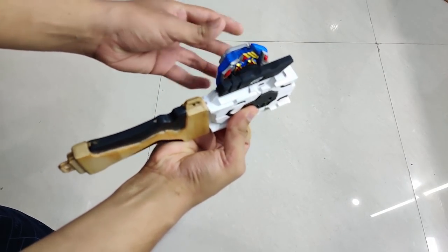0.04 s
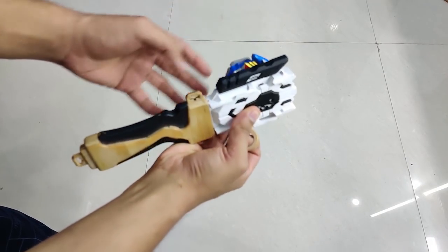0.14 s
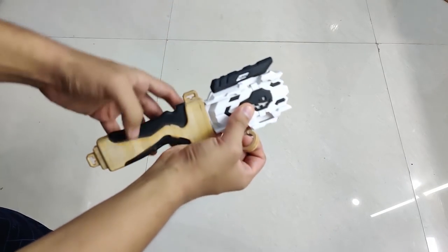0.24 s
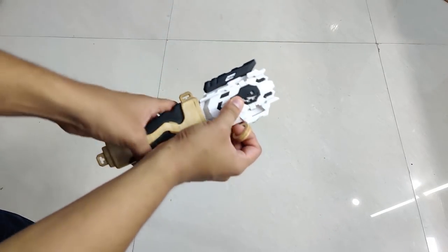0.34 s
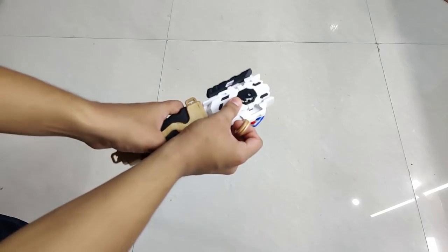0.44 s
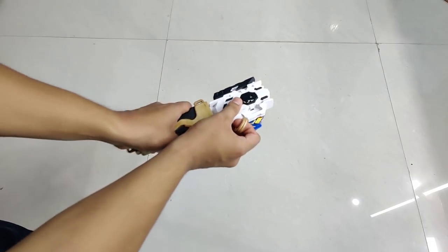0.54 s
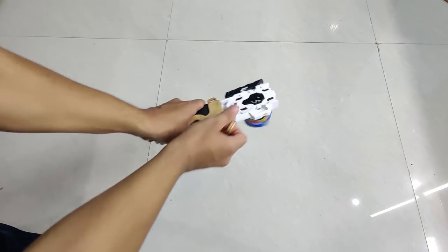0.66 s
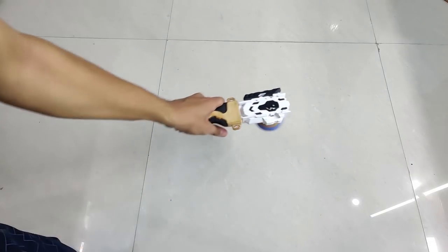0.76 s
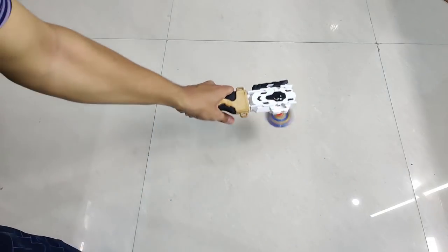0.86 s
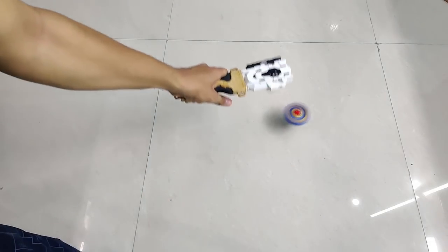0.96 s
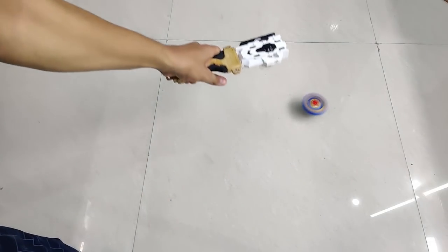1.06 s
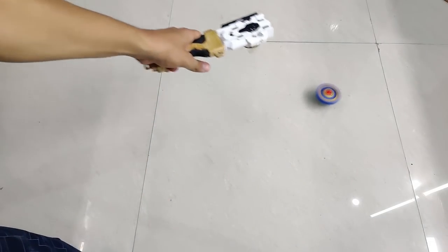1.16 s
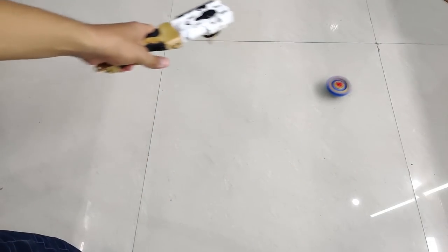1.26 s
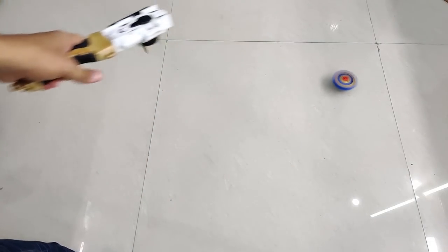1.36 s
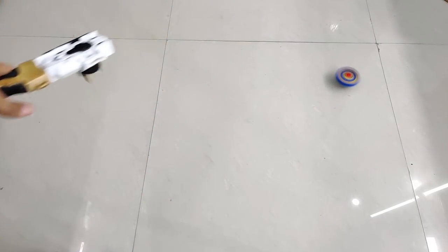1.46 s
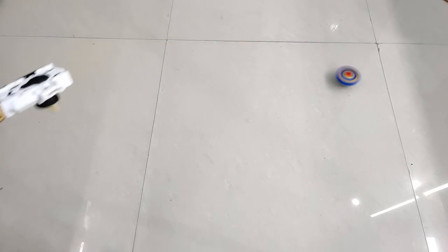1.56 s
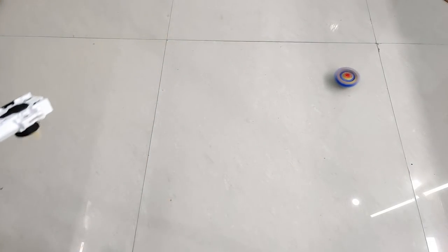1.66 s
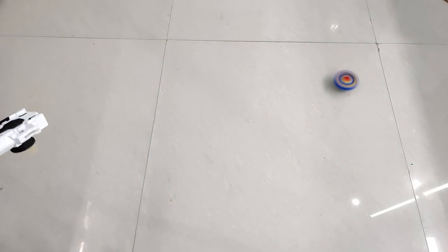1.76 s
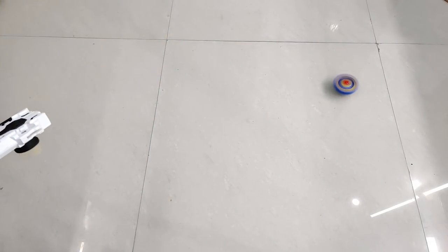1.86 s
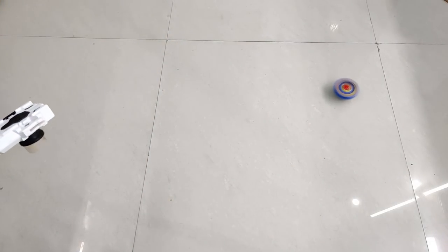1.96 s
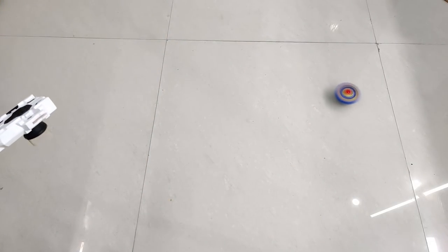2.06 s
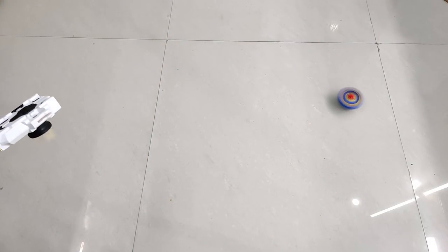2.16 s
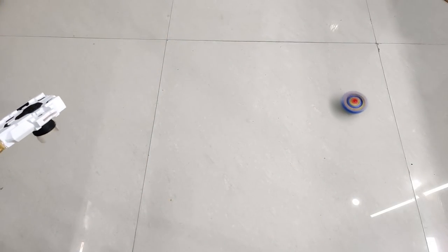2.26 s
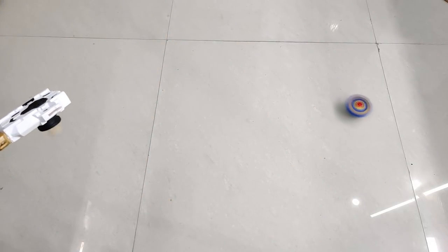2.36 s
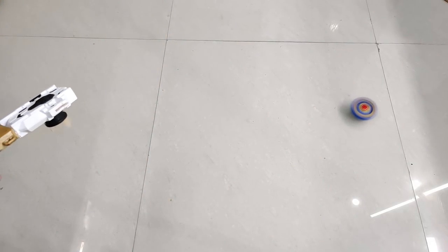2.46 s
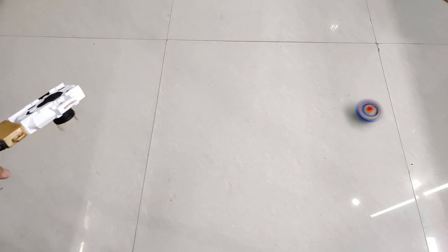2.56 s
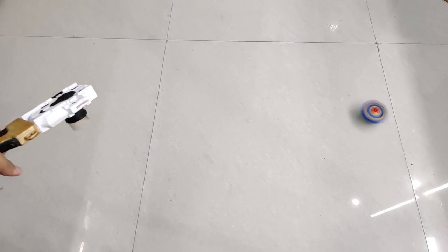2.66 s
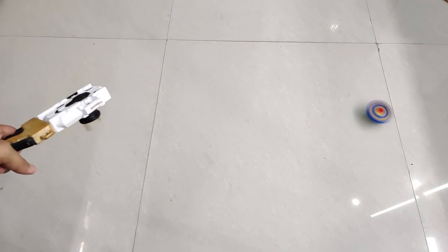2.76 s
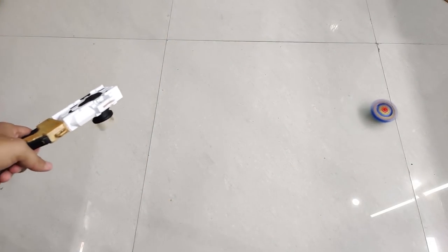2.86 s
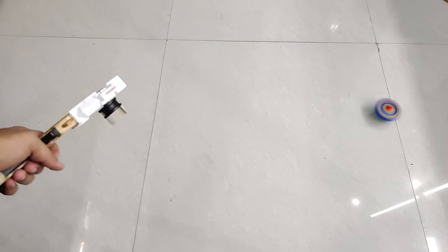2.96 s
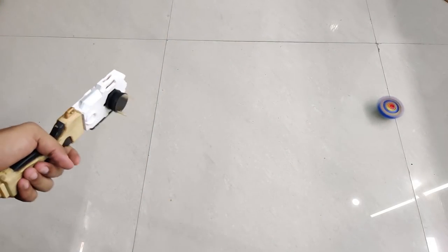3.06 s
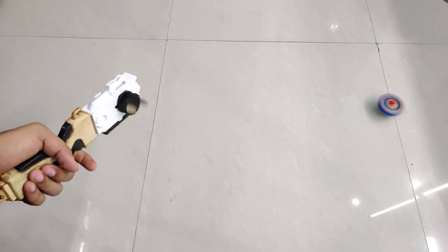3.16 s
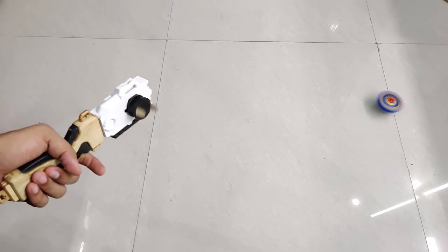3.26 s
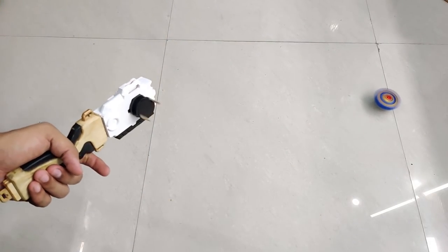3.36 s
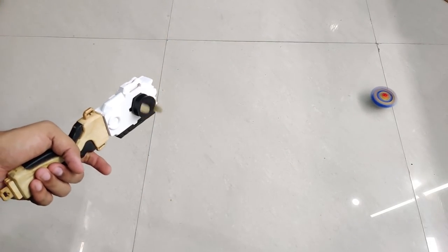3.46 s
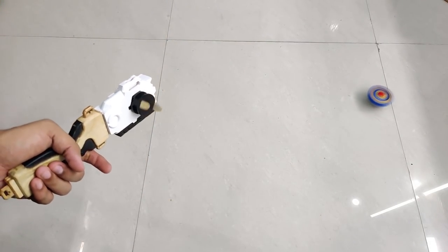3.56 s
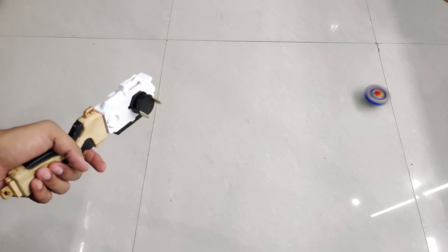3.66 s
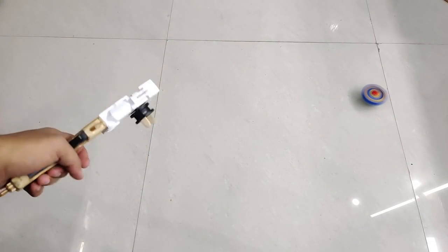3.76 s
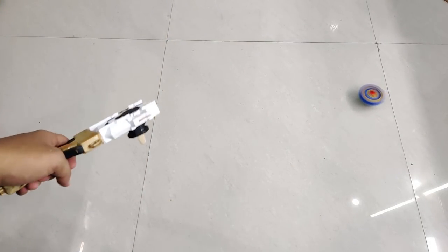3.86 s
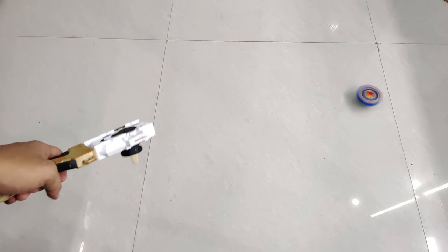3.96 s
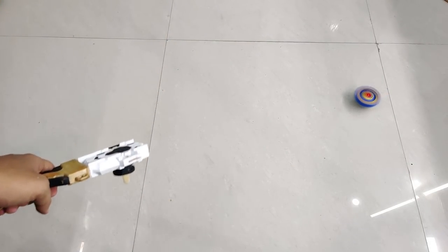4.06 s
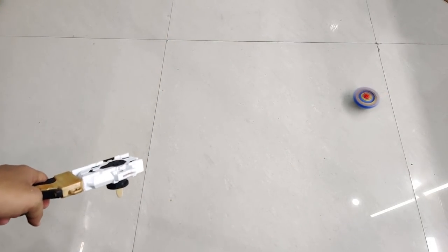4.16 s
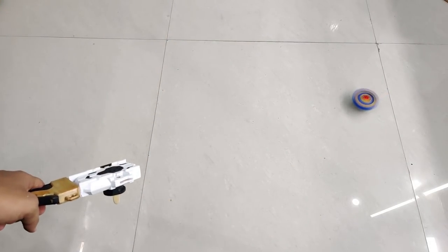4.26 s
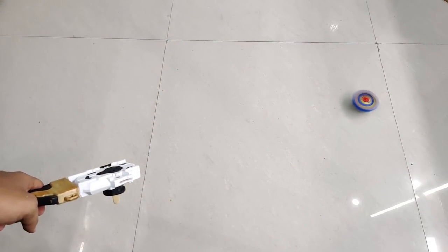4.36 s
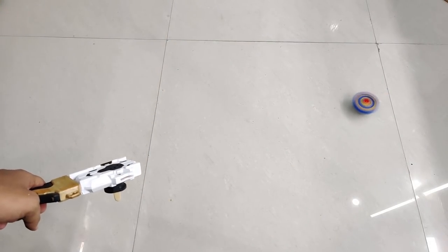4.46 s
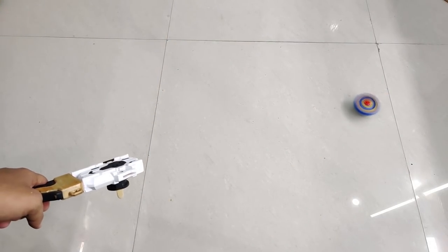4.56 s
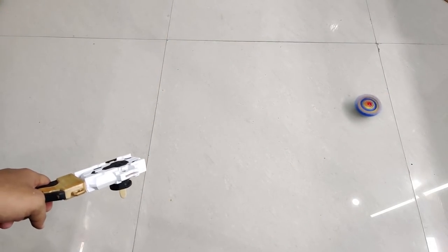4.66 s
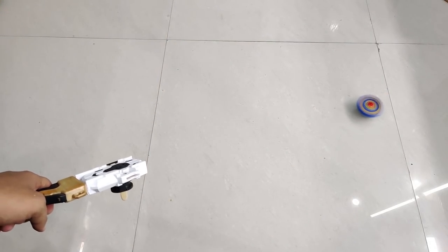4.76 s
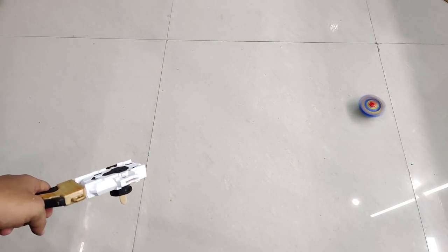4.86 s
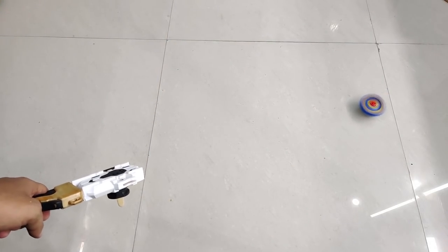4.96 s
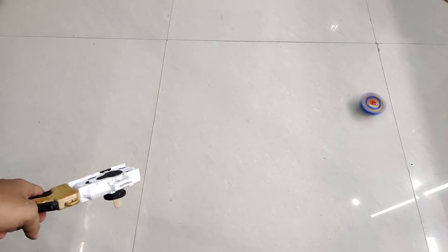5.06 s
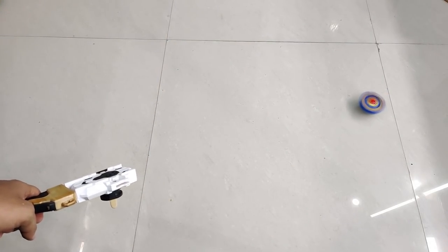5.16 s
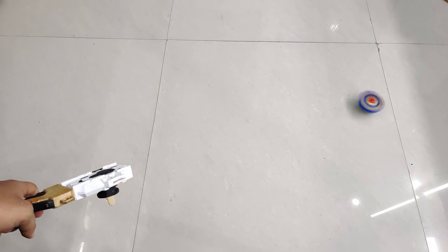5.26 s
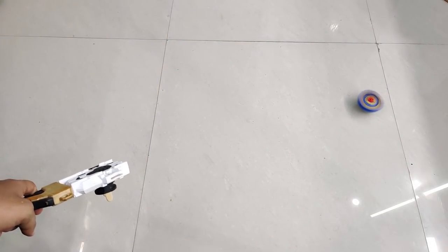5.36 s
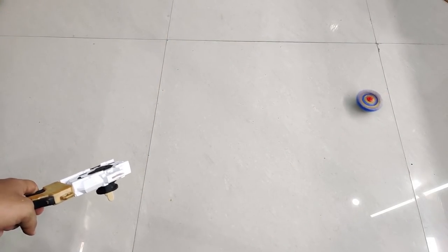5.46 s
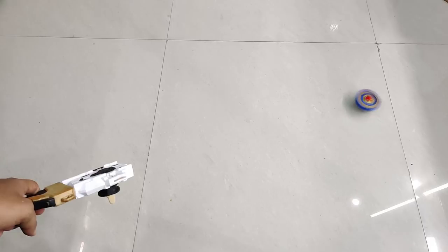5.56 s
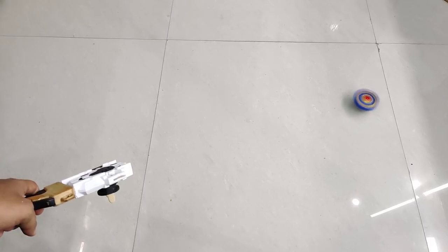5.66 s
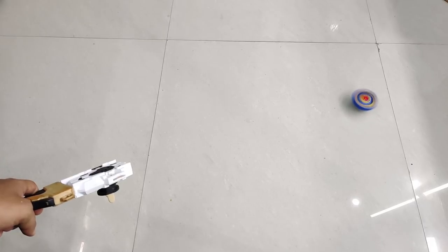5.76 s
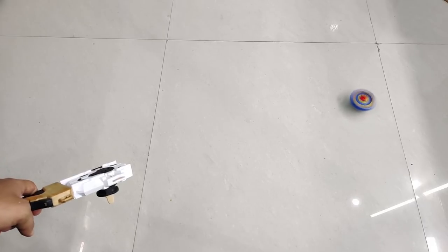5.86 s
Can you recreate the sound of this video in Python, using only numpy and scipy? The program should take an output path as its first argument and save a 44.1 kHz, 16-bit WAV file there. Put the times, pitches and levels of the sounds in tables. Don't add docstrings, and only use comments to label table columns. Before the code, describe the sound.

Close stereo phone capture in a hard-walled room: soft skin rubbing on a toy launcher, then a sudden bright ratcheting rip, hollow gears running free and several hard plastic knocks on tile. The spinning top scrapes and buzzes, swells in a rocking rattle around two seconds, then thins with tiny gritty clicks to a barely audible whirr beneath steady electrical hum.

```python
import sys
import numpy as np
from scipy import signal
from scipy.fft import rfft, irfft, next_fast_len
from scipy.io import wavfile
from scipy.ndimage import uniform_filter1d, map_coordinates

SR = 44100
rng = np.random.default_rng(int(sys.argv[2]) if len(sys.argv) > 2 else 0)


def inscribe(sig):
    pcm = np.round(np.clip(np.atleast_2d(sig).T, -1, 1) * 32767)
    wavfile.write(sys.argv[1], SR, pcm.astype(np.int16))


def nominal_scale(level):
    x = np.asarray(level, float) / 20
    return 10 ** x


N = 260631

# (frequency [Hz], density [dB per Hz])
GEAR_HISS = [(4700, -23), (8000, -1.5), (9400, -12.5), (10300, -5.5), (12100, -6), (14500, 0.5),
             (16000, -4)]
# (frequency [Hz], density [dB per Hz])
FREE_GEARS = [(290, -50), (500, -17.5), (1000, -10), (1450, 1.5), (1950, -19), (2400, -10.5), (4270, -3.5),
              (7000, -20.5), (8650, -17), (15800, -9)]


def unit(x):
    return x / np.sqrt(np.mean(x ** 2) + 1e-20)


def along(points, hz):
    f, v = np.transpose(points)
    return np.interp(np.log(hz + 1), np.log(f + 1), v)


def curves(rows):
    s, *columns = np.transpose(rows)
    t = np.arange(N) / SR
    inside = 1. * (t > s[0]) * (t < s[-1])
    return [np.interp(t, s, c) for c in columns] + [uniform_filter1d(inside, size=60)]


def swells(rows):
    t, power = np.arange(N) / SR, 0
    for s, half, *db in rows:
        power = power + nominal_scale(2 * np.array(db)[:, None] - 9.6 * ((t - s) / half) ** 2)
    return np.sqrt(power)


def wobble(rate):
    coarse = np.arange(0, N + 16, 16)
    knots = rng.standard_normal(int(N * rate / SR) + 4)
    return np.interp(np.arange(N), coarse, map_coordinates(knots, [coarse * rate / SR]))


def filtered(x, response):
    n = x.shape[-1]
    m = next_fast_len(n + 4096, True)
    return irfft(rfft(x, m) * response(np.fft.rfftfreq(m, 1 / SR)), m)[..., :n]


def colour(points):
    return lambda hz: nominal_scale(along(points, hz))


def modes(rows):
    def response(f):
        total = 0
        for k, (centre, width, db) in enumerate(rows):
            damping = 1j * f * width
            total = total + (-1) ** k * nominal_scale(db) * damping / (centre * centre - f * f + damping)
        return total
    return response


def steep(rows):
    return lambda f: modes(rows)(f) ** 2


def pair(beat, response):
    # (frequency [Hz], correlation [-1 to 1])
    coherence = [(60, 0.89), (270, .9), (450, 0.61), (740, 0.23), (1400, -0.27), (3100, 0.029),
                 (9000, -0.1), (15000, -0.0015)]
    turn = lambda hz: np.arccos(np.clip(along(coherence, hz), -1, 1)) / 2
    split = lambda hz: response(hz) * [np.cos(turn(hz)), np.sin(turn(hz))]
    mid, side = filtered(beat * rng.standard_normal((2, N)), split)
    return unit(np.array([mid + side, mid - side]))


def panned(db):
    return nominal_scale(np.array([db / 2, -db / 2]))


def patchy(x, depth_db):
    z = signal.stft(x, nperseg=512)[2]
    field = uniform_filter1d(rng.standard_normal(z.shape[1:]), size=3, axis=0)
    field = uniform_filter1d(field, size=50, axis=1)
    return unit(signal.istft(z * nominal_scale(depth_db * unit(field)), nperseg=512)[1][:, :N])


def bursts(rows, db, t60, response):
    t, out = np.arange(SR // 20) / SR, np.zeros((2, N + SR))
    shared, own = rng.standard_normal((2, len(rows), 2, len(t)))
    snap = 4 * (t == 0)
    chatter = shared[:, :1] + 0.93 * own
    shots = filtered(nominal_scale(-60 * t / t60) * (chatter + snap), response)
    for row, level, shot in zip(rows, db, shots):
        start = round(row[0] * SR)
        shot = shot / abs(shot).max(1, keepdims=True)
        out[:, start:start + len(t)] += nominal_scale(level) * panned(row[-1])[:, None] * shot
    return out[:, :N]


def room_tone():
    # (time [s], gain [dB])
    gain_control = [(0.0, 0), (0.66, 1.5), (0.91, 3.5), (0.99, -4), (1.02, -9), (1.15, 1), (1.35, 5.5),
                    (2.83, 5.5), (4.08, 0), (5.6, 1.2), (5.91, -0.3)]
    # (frequency [Hz], width [Hz], level [dB])
    machinery = [(12, 12, -4.5), (56.1, 34, 0), (92.5, 20, -2), (148, 14, -6.5)]
    # (time [s], half length [s], level [dB])
    jolt = [
        (.87, 0.049, -47.5),
    ]
    # (frequency [Hz], level [dB])
    whines = [(1733, -86), (2982, -86), (3849, -76.5), (4328, -83)]
    # (frequency [Hz], density [dB per Hz])
    air_noise = [(110, -6.5), (170, 0), (260, -2), (860, -10.5), (1320, -13.5), (2320, -18), (3300, -18),
                 (3650, -14.5), (4300, -13.5), (4700, -23), (5420, -24), (8800, -26), (15000, -23.5),
                 (15800, -27)]
    hum_hz, hum_db = 199.6, -53
    slip_s = 3.053
    upper_db, lower_db, wander_db = -64.5, -62.5, 1.5

    t, lift_db = np.arange(N) / SR, curves(gain_control)[0]
    slip = np.sign(t - slip_s) * np.clip(abs(t - slip_s) / 0.0022, 0, 1)
    hum = np.sin(2 * np.pi * hum_hz * t + 0.33 * wobble(1.7))
    hum = np.sqrt(2) * nominal_scale(hum_db + lift_db + 0.18 * wobble(9.3)) * slip * hum

    upper, lower = pair(1, steep(machinery[2:])), pair(1, steep(machinery[:2]))
    drone = nominal_scale(upper_db + lift_db + wander_db * wobble(2.98)) * upper
    drone += np.hypot(nominal_scale(lower_db + lift_db + wander_db * wobble(3.14)), swells(jolt)) * lower

    flicker_db, drift = 1.5 * wobble(9), .6 * wobble(8)
    phase = drift + [[0], [1]]
    whine = sum(nominal_scale(db + flicker_db) * np.sin(2 * np.pi * hz * t + phase) for hz, db in whines)
    air = nominal_scale(-63.0 + lift_db) * pair(nominal_scale(0.47 * wobble(23)), colour(air_noise))
    return hum + drone + nominal_scale(1.7 + 0.6 * lift_db) * whine + air


def hands():
    # (time [s], half length [s], rub [dB], squeak [dB], hiss [dB])
    strokes = [
        (.328, 0.012, -68, -90, -83),
        (.49, 0.044, -64.5, -68, -67),
        (.6, .07, -59.5, -74.5, -72),
        (.672, 0.026, -60, -67, -86),
        (.74, .014, -55, -63, -57.5),
    ]
    # (frequency [Hz], density [dB per Hz])
    skin = [(240, -33.5), (400, -10.5), (531, -5), (975, -7), (1240, -9), (1460, -6.5), (1590, -20),
            (2150, -18), (4500, -13.5), (5850, -37), (9900, -120)]
    # (frequency [Hz], density [dB per Hz])
    skin_hiss = [(4000, -29.5), (6000, 2), (9000, -2.5), (15000, -7), (16000, -7.5)]
    rub, squeak, hiss = swells(strokes)
    rub = rub * nominal_scale(4.5) * pair(nominal_scale(1.1 * wobble(39.2)), colour(skin))
    squeak = squeak * nominal_scale(4.0) * pair(1, steep([(4870, 290, 0)]))
    return rub + squeak + hiss * nominal_scale(2.5) * pair(1, colour(skin_hiss))


def ticks():
    # (time [s], peak [dB], left-right [dB])
    grains = np.array([(3.1524, -52, 14), (3.191, -36, 7), (3.1944, -39.5, 6.5), (3.2004, -41, 2.5),
                       (3.2144, -46.5, 6.5), (3.2365, -37, 8.5), (3.2444, -40, 6.5), (3.262, -36, 8.5),
                       (3.2766, -36, 6), (3.3236, -30.5, 9), (3.3498, -45, 2), (3.3858, -40.5, 3.5),
                       (3.4046, -44, 7.5), (3.4371, -39.5, 4), (3.462, -42, -1), (3.4854, -49.5, 2.5),
                       (3.5154, -46.5, 11.5), (3.5194, -43.5, 5), (3.5228, -35, 2), (3.5904, -57, 4.5),
                       (3.6232, -56, 0), (3.6384, -43, 1.5)])
    # (time [s], peak [dB], left-right [dB])
    taps = np.array([
        (0.325, -59, 1.5),
        (5.296, -48.5, 0),
    ])
    # (frequency [Hz], density [dB per Hz])
    grit = [(8000, -39.5), (11500, -14.5), (14500, 7.5), (16200, -7.5)]
    cracking = bursts(grains, grains[:, 1] - .3, .011, colour(grit))
    return cracking + bursts(taps, taps[:, 1] + 1.5, 0.021, colour(FREE_GEARS))


def contacts():
    # (time [s], peak [dB], knock [dB], sizzle [dB], left-right [dB])
    knocks = np.array([(0.8458, -17, -23.5, -9.5, -8), (0.8894, -16.5, -8.5, -7, 3.5),
                       (0.8925, -17, -13.5, -8, 4), (0.9105, -23, -15, -11, 5.5),
                       (0.9859, -19, 2, -16.5, -4), (0.9867, -12.5, -8, -14.5, -3),
                       (1.076, -22.5, -7, -9.5, 2), (1.0798, -15.5, -12, -10.5, 2),
                       (1.094, -14, -22, -19, -5), (1.108, -11.5, -7, -19, -10),
                       (1.1092, -12, -19.5, -19, -10), (1.1712, -13, -7, -18, -4),
                       (1.226, -23, -11.5, -21, -7)])
    # (frequency [Hz], density [dB per Hz])
    crack_spectrum = [(1000, -23.5), (2000, -10.5), (3300, -4.5), (4800, 3.5), (7500, -1), (10000, -12)]
    # (frequency [Hz], width [Hz], level [dB])
    body = [(1520, 1200, 8.5), (2280, 1570, 10)]
    peak, knock, sizzle = knocks[:, 1], knocks[:, 2], knocks[:, 3]
    crack_t60, thud_t60 = .008, .007
    out = bursts(knocks, peak + 3, crack_t60, colour(crack_spectrum))
    out = out + bursts(knocks, peak + knock + 4, thud_t60, steep(body))
    return out + bursts(knocks, peak + sizzle + 1.5, crack_t60, colour(GEAR_HISS))


def launcher():
    # (time [s], level [dB])
    drag = [
        (.695, -70.5),
        (.719, -70),
        (.743, -47.5),
        (.775, -34),
        (.819, -27.5),
        (.915, -23),
        (.973, -23.5),
        (.98, -25.5),
        (.985, -30.5),
    ]
    # (time [s], left-right [dB])
    swing = [
        (.72, 5),
        (.82, -0.7),
        (.984, 1),
    ]
    # (time [s], half length [s], housing ring [dB], handle boom [dB], rack whistle [dB])
    strain = [
        (.727, .018, -49, -62, -73),
        (.765, .018, -39, -54, -42),
        (.79, .02, -48, -56, -37.5),
        (.945, .045, -36.5, -32.5, -48.5),
    ]
    # (time [s], level [dB], left-right [dB])
    free_run = [
        (.983, -27, 4.5),
        (1.0, -30.5, -6.5),
        (1.04, -31.5, -4),
        (1.0765, -34.5, -4),
    ]
    # (frequency [Hz], density [dB per Hz])
    gears = [(150, -37.5), (250, -12), (485, -7), (593, -9), (833, -5), (1260, -7.5), (1480, -3.5),
             (1950, -1.5), (2490, -0.5), (4410, 2), (5560, 3), (7570, 2), (10000, -3.5), (13000, -33.5),
             (22000, -120)]
    pull_db, on = curves(drag)
    pan_db, (ring, boom, whistle) = curves(swing)[0], swells(strain)
    coast_db, coast_pan_db, free = curves(free_run)
    pull = nominal_scale(pull_db - 0.2)

    slack_db, taut_db, wakes_db, growth = -6.5, 2.2, -33, 1.3
    hiss_db = np.clip(slack_db + growth * (pull_db - wakes_db), slack_db, taut_db)
    teeth = nominal_scale(1.4 * wobble(900) + 0.79 * wobble(170) + 0.29 * wobble(45.03))
    rip = pull * (pair(teeth, colour(gears)) + nominal_scale(hiss_db) * pair(teeth, colour(GEAR_HISS)))

    ring = np.hypot(ring, pull * nominal_scale(-14.5))
    rip += nominal_scale(-2.5) * ring * pair(teeth, steep([(1813, 270, 0)]))
    rip += nominal_scale(-4.5) * boom * pair(teeth, steep([(800, 210, 0)]))
    rip += whistle * pair(teeth, steep([(5350, 716, 0)]))
    coast = free * nominal_scale(coast_db + 1.0) * panned(coast_pan_db) * pair(teeth, colour(FREE_GEARS))
    return on * panned(pan_db) * rip + coast


def top():
    # (time [s], rate [turns per s], skidding share [0-1])
    spin = [
        (1, 85, 0.7),
        (1.55, 60, 0.86),
        (1.85, 87, 0.31),
        (2.9, 84, 0.17),
        (3.3, 60, .05),
        (4.9, 52, .05),
        (5.9, 52, 0.02),
    ]
    # (time [s], level [dB])
    scraping = [(1.08, -29), (1.1, -25.5), (1.13, -29), (1.27, -32), (1.37, -35), (1.52, -38),
                (1.67, -42.5), (2.37, -44.5), (3.03, -48.5), (3.2, -55), (3.51, -67.5), (3.72, -74.5),
                (4.43, -73), (5.32, -76), (5.91, -73)]
    # (time [s], half length [s], low mode [dB], high mode [dB])
    rocking = [(1.078, 0.018, -29, -35), (1.13, .025, -39.5, -45), (1.19, 0.02, -54, -38),
               (1.235, .03, -38, -47), (1.275, 0.026, -46, -35.5), (1.36, 0.037, -54, -60),
               (1.43, .04, -63, -45), (1.58, 0.036, -70, -42), (1.8, 0.072, -45.5, -39),
               (1.9, 0.091, -41, -38.5), (2.09, 0.057, -44.5, -42.5), (2.5, 0.44, -68, -51),
               (2.73, 0.036, -56, -63), (2.88, 0.042, -50, -59), (3.02, 0.095, -54.5, -55),
               (3.28, 0.22, -54.5, -73), (3.82, 0.19, -66.5, -76), (4.5, 0.39, -68, -75),
               (5.07, 0.13, -68.5, -78), (5.7, 0.16, -71, -77.5)]
    # (time [s], half length [s], hiss [dB])
    dust = [
        (1.5, 0.07, -43.5),
        (3.3, 0.22, -61),
        (3.8, 0.44, -73),
    ]
    # (frequency [Hz], width [Hz], level [dB])
    shell_low = [(1545, 230, 0)]
    shell_high = [(1930, 380, 0)]
    # (frequency [Hz], density [dB per Hz])
    skid_spectrum = [(180, -42.5), (300, -15), (396, -16.5), (692, -13), (970, -7), (1230, -11), (1460, -2),
                     (1600, -8.5), (1960, -4), (2240, -8.5), (3090, 0.5), (3430, -7), (3970, 4), (6070, -2),
                     (10000, -13), (13000, -43.5), (22000, -120)]
    rattle_spectrum = [(180, -41), (300, -18), (509, -14.5), (540, -17), (564, -13.5), (970, -6.5),
                       (1160, -8), (1550, -4.5), (2240, -5), (2560, -2), (2960, -1.5), (3530, -4),
                       (5240, -7.5), (6730, -13.5), (10000, -47), (13000, -51.5), (22000, -120)]
    tip_hiss = [(4700, -19), (8000, -2.5), (10500, -2.5), (12700, 1), (14100, 4), (16000, 4.5)]
    landing_s, lean_s, topple_s = 1.0755, 3.0, 5.22

    t, scrape, (low, high) = np.arange(N) / SR, nominal_scale(curves(scraping)[0]), swells(rocking)
    turns, skid, _ = curves(spin)
    skid = np.clip(skid, 0, 1)
    angle = 2 * np.pi * np.cumsum(turns) / SR + .5 * wobble(14)
    scuff = np.cos(angle) * (1 + 0.32 * wobble(7.9))
    grain = wobble(700)

    low_beat, high_beat = nominal_scale(1.6 * scuff + 1.2 * grain), nominal_scale(1.7 * scuff + 1.6 * grain)
    whirr = nominal_scale(-71)
    shell = np.hypot(low, whirr) * nominal_scale(1.6) * pair(low_beat, steep(shell_low))
    shell += np.hypot(high, scrape * nominal_scale(-8)) * nominal_scale(-2.0) * pair(high_beat, steep(shell_high))

    topple = nominal_scale(-80.5 + 14 * np.maximum(t - topple_s, 0))
    lean = np.hypot(low * nominal_scale(-10), topple)
    shell += (t > lean_s) * lean * nominal_scale(3.5) * pair(nominal_scale(1.5 * scuff), steep([(1063, 210, 0)]))

    beat = nominal_scale(0.33 * scuff + 0.93 * grain + 0.5 * wobble(35.12))
    rattle = np.sqrt(skid) * pair(beat, colour(skid_spectrum))
    rattle = rattle + np.sqrt(1 - skid) * pair(beat, colour(rattle_spectrum))
    rattle = np.hypot(scrape, low * nominal_scale(-2.5)) * nominal_scale(2.0) * patchy(rattle, depth_db=1.6)

    hiss = np.hypot(scrape * nominal_scale(-6), swells(dust)) * nominal_scale(6.5)
    hiss = hiss * pair(nominal_scale(.6 * scuff + .9 * grain), colour(tip_hiss))
    return (t > landing_s) * (shell + rattle + hiss)


def walls(x):
    # (frequency [Hz], t60 [s])
    decay = [(300, 0.41), (2000, 0.56), (8000, 0.54), (15000, 0.22)]
    hz, t, z = signal.stft(rng.standard_normal((2, SR // 2)), SR, nperseg=256)
    tail = signal.istft(z * nominal_scale(-60 * t / along(decay, hz)[:, None]), SR, nperseg=256)[1]
    delayed = np.pad(x, ((0, 0), (300, 0)))
    return signal.fftconvolve(delayed, tail / np.linalg.norm(tail[0]), axes=1)[:, :N]


def scene():
    hits, grit = contacts(), ticks()
    echo = walls(nominal_scale(2.5) * hits + nominal_scale(-5.0) * grit)
    return room_tone() + hands() + grit + hits + launcher() + top() + echo


def top_cut(x):
    return signal.sosfilt(signal.butter(12, 16710, fs=SR, output="sos"), x)


def record(dry):
    # (frequency [Hz], left over right [dB])
    louder_left = [(60, 4), (110, 2), (200, 4.0), (380, 5), (700, 4), (1290, 5), (2380, 4), (4400, 4.5),
                   (8120, -1), (15000, 5)]
    top_hz = 15780
    ports = filtered(dry, lambda hz: panned(along(louder_left, hz)) * (hz < top_hz))
    return top_cut(ports)


dry = scene()
out = record(dry)
inscribe(out)
```